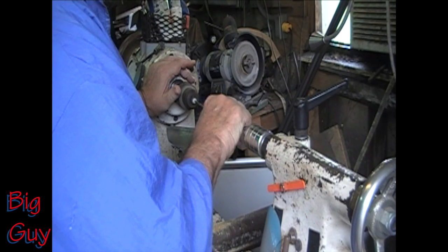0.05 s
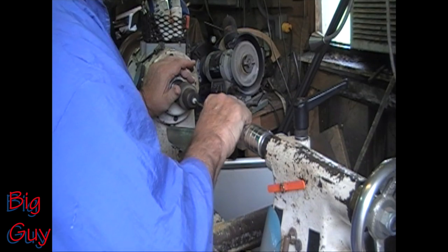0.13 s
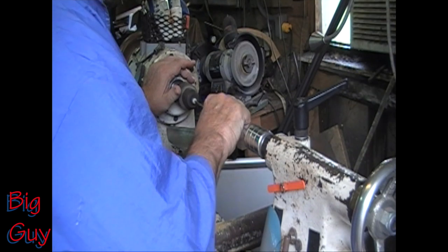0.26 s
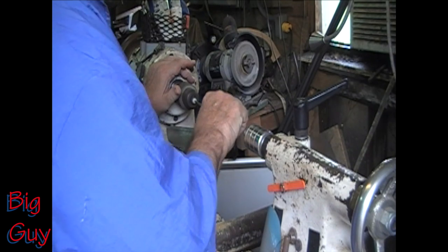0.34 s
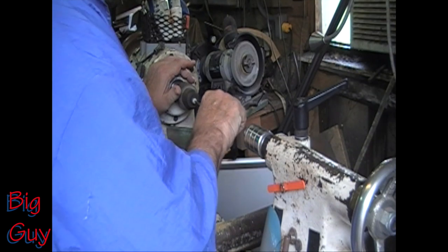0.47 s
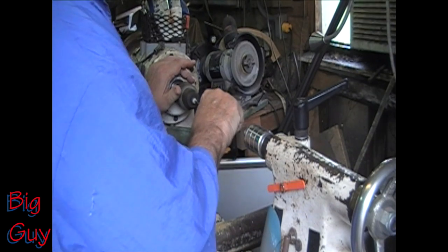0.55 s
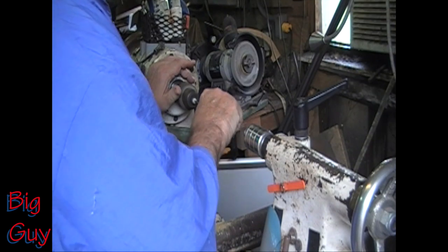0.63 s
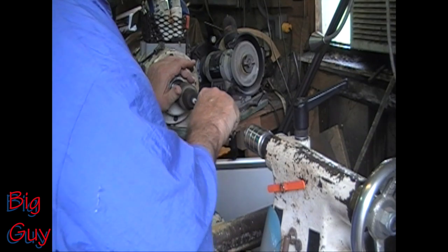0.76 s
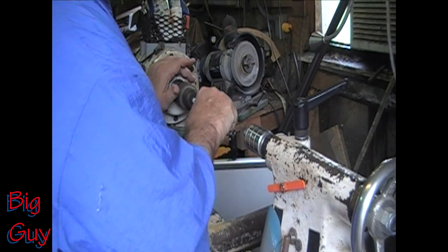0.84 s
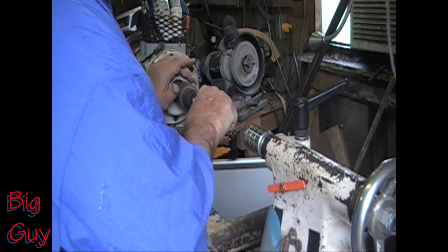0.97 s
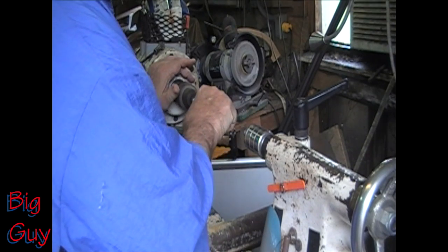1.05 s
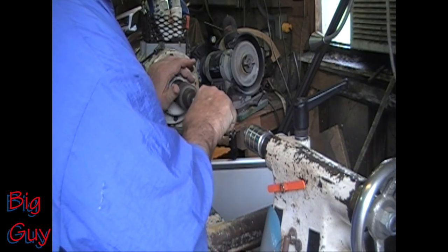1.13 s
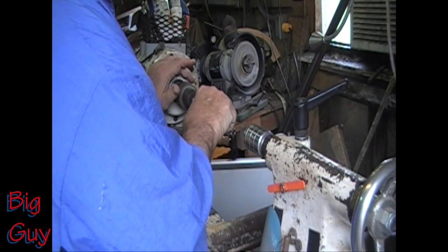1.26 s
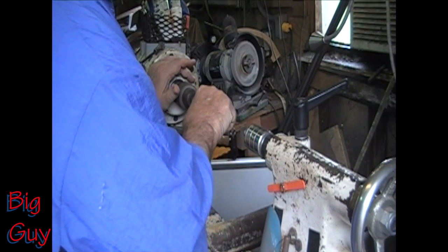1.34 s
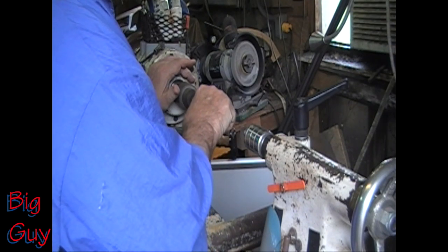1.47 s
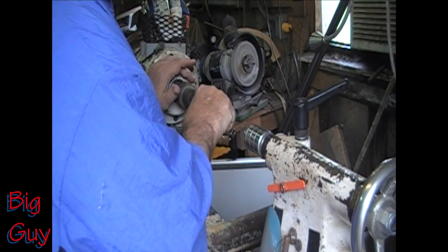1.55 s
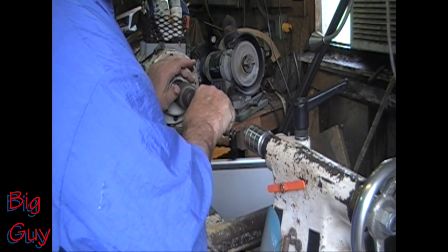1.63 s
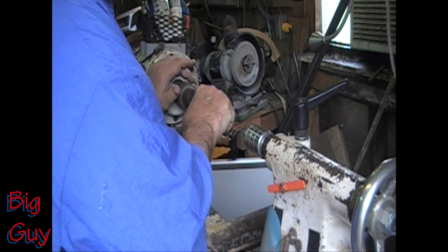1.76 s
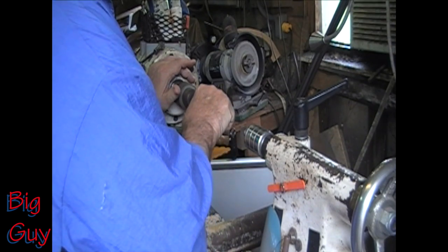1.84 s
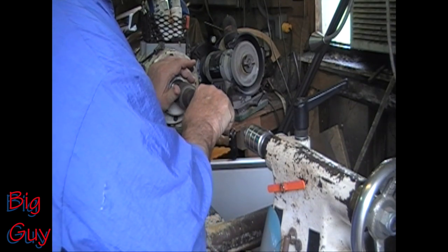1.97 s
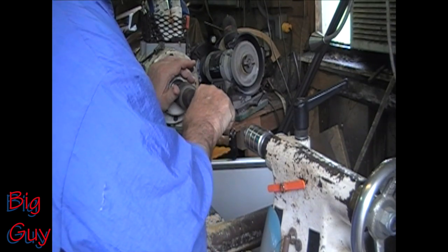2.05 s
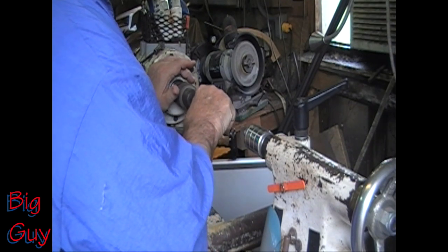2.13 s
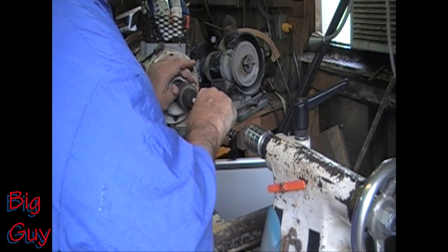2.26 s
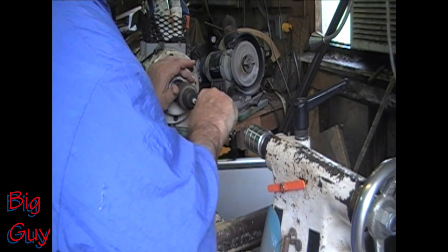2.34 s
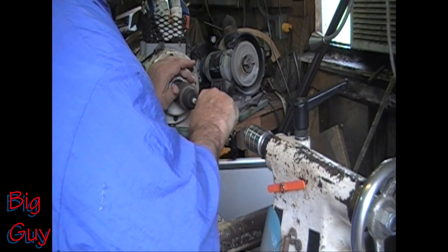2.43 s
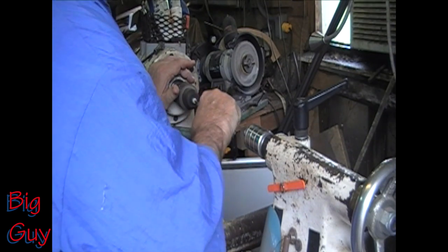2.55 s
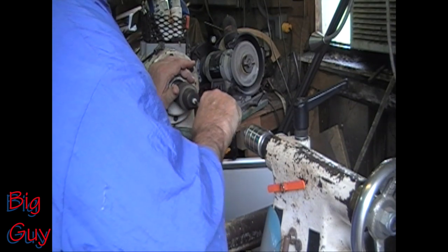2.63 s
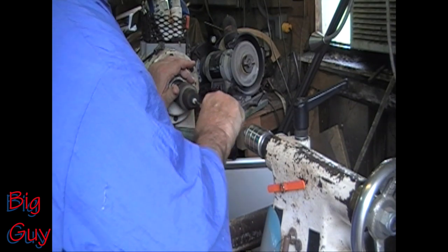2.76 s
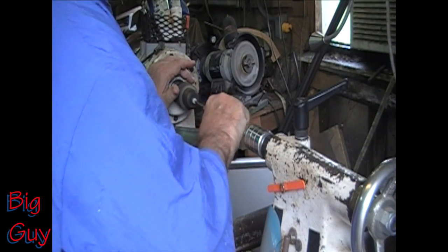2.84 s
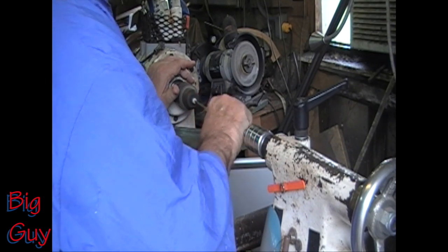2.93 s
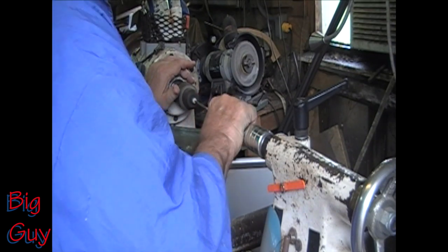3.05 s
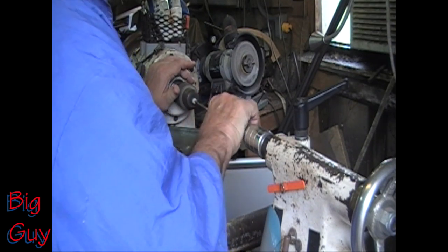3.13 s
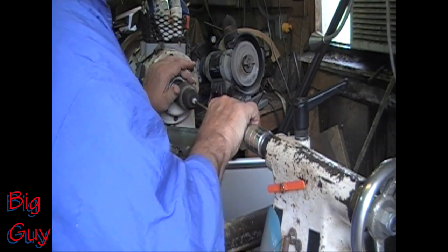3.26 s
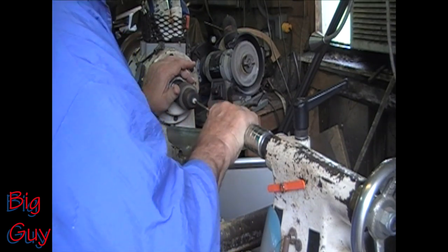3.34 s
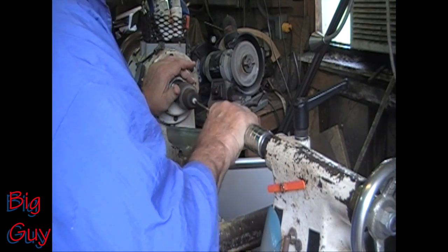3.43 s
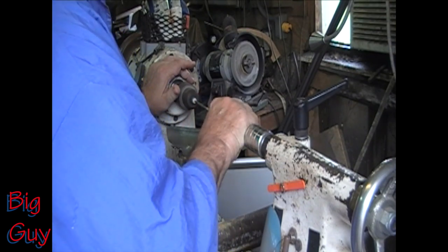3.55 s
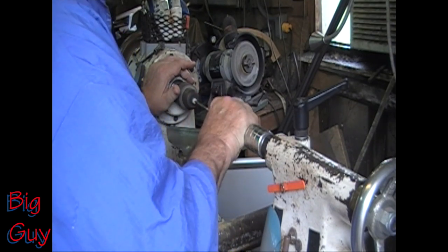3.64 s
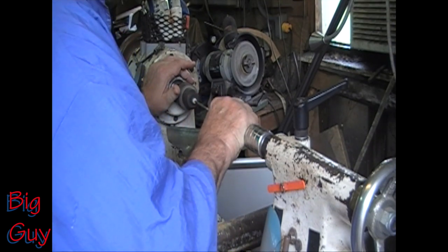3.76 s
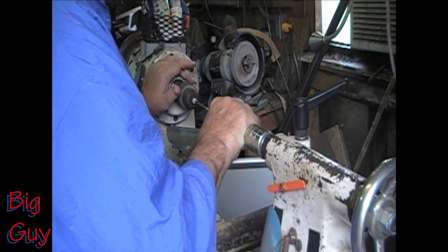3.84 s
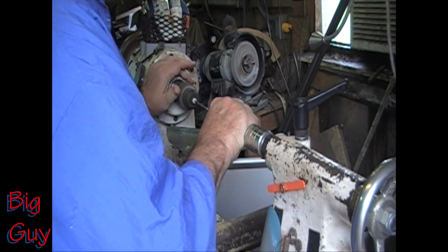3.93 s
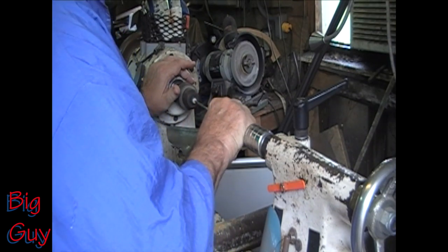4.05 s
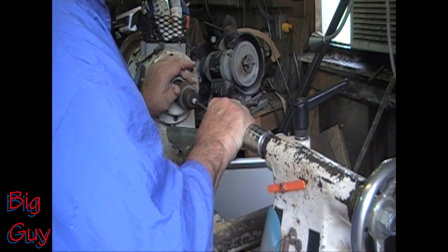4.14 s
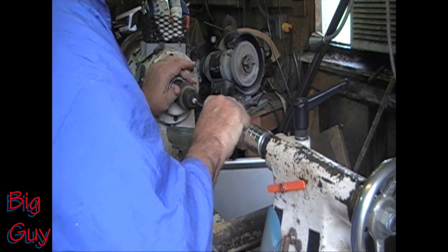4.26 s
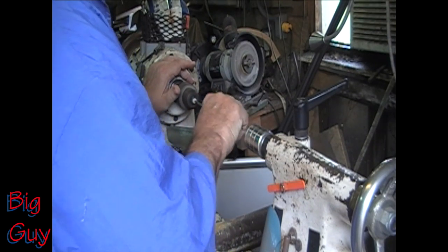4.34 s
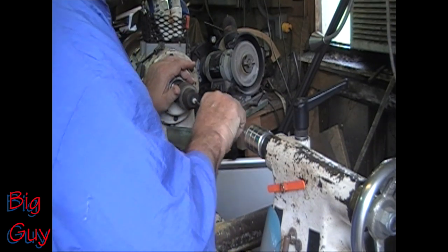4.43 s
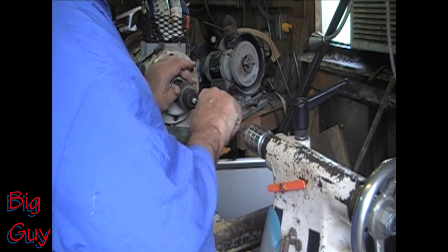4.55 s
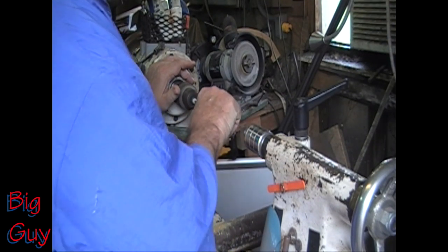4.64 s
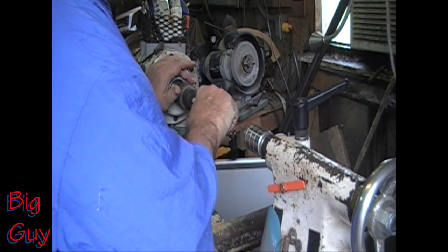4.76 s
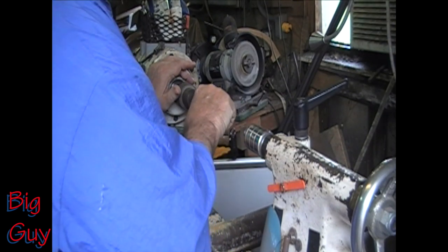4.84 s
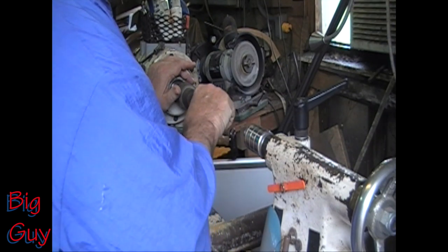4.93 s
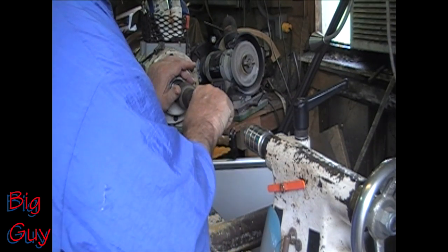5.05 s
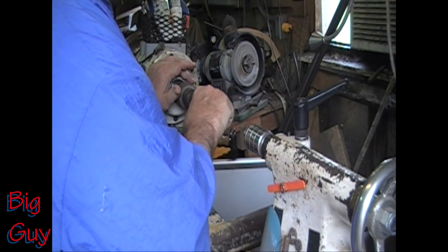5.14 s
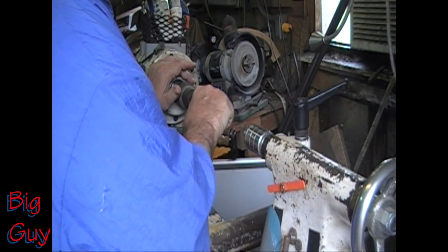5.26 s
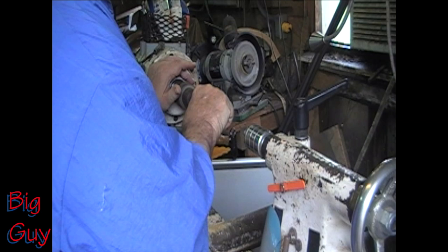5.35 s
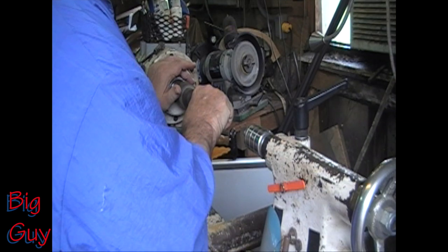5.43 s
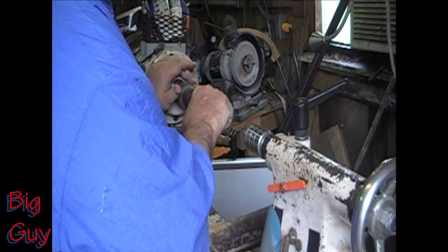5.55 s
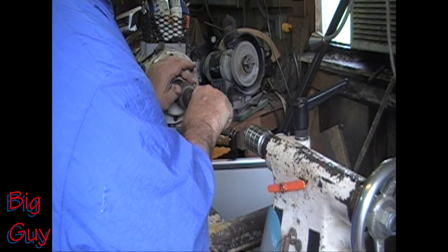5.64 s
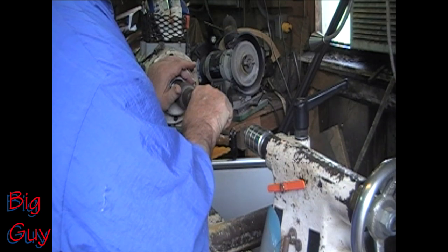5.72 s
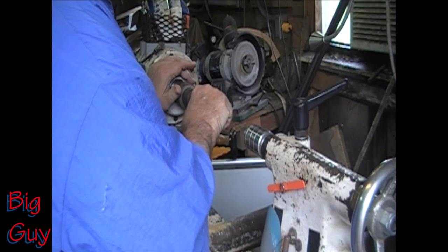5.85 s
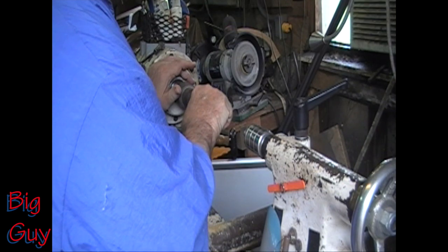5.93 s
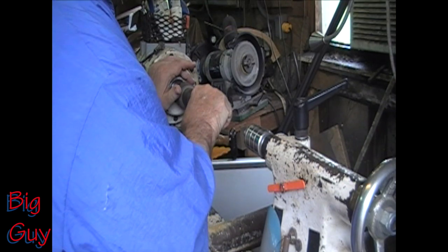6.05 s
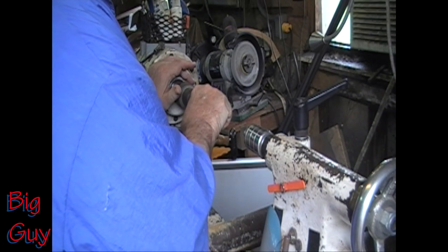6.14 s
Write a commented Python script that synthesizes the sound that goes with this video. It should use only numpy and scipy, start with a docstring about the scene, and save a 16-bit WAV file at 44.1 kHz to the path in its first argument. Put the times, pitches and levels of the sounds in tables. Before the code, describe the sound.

A wood lathe rumbles and rasps as a long drill bit bores in, breaking into two spells of piercing, wavering metallic squeals.

```python
"""A lathe rumbles, hums and rasps throughout as a long drill bit is pushed by hand into a spinning blank.
Faint chirps sound from the start and loud squeals from one second on, in a small workshop.
The steel squeals in the bore: friction excites near-sines that waver once per turn.
Rumble and rasp are noise shaped by resonances, the hum is a set of steady tones, a knock is a noise burst.
The recorder's gain control ducks under the loud squeals, so the rumble sinks and comes back slowly."""
import sys
import numpy as np
from scipy import signal
from scipy.fft import rfft, irfft, next_fast_len
from scipy.io import wavfile
from scipy.ndimage import uniform_filter1d, minimum_filter1d

SR = 44100
rng = np.random.default_rng(int(sys.argv[2]) if len(sys.argv) > 2 else 0)


def file_out(sig):
    """Save sig as 16-bit WAV at sys.argv[1]."""
    # one column per channel
    cols = np.atleast_2d(sig).T
    # limit, then scale
    lim = np.clip(cols, -1, 1)
    pcm = np.round(lim * 32767).astype(np.int16)
    wavfile.write(sys.argv[1], SR, pcm)


N = 272979

# Source levels are those ahead of the gain control.
# Squeals with a winding pitch and level, one table each:
# (time [s], pitch [Hz], level [dB], pitch swing per turn [%])
SQUEALS = [
    [(1.008, 7650, -50, 0.89), (1.02, 8050, -23, 0.67), (1.034, 8320, -2, 0.9), (1.05, 8970, -20.5, 0.5),
     (1.105, 9050, -27.5, 0.77), (1.14, 9280, -25.5, 3.1), (1.296, 9470, -21, 1.7),
     (1.36, 9460, -19.5, 2.86), (1.465, 9480, -24, 1.65), (1.495, 10090, -23.5, 3.2),
     (1.58, 9900, -23, 2.4), (1.63, 10100, -22, 2.75), (1.662, 10300, -28.5, 4.3), (1.695, 10090, -25, 3.4),
     (1.85, 9960, -24, 3.45), (1.94, 9870, -26, 2.9), (1.975, 10070, -24.5, 2.24), (2.02, 9630, -25, 2.7),
     (2.05, 9490, -22.5, 3.3), (2.078, 8960, -22, 2.4), (2.15, 8460, -20.5, 2.14),
     (2.21, 8270, -20.5, 1.27), (2.27, 8890, -23.5, 3.05), (2.37, 8530, -18.5, 2.4),
     (2.462, 8240, -17, 1.37), (2.475, 8270, -28, 1.35), (2.52, 8170, -21, 1.3), (2.566, 7540, -22.5, 1.25),
     (2.586, 7280, -16, 1.45), (2.662, 6820, -15.5, 2.35), (2.732, 6496, -21.5, 1.85),
     (2.745, 6130, -48.5, 1.7)],
    [(1.085, 10270, -39, 2.2), (1.18, 10570, -36, 3), (1.25, 10730, -26.5, 0.83), (1.31, 10800, -31, 1.08),
     (1.365, 10920, -28, 1.1), (1.435, 11130, -40, 1.1), (1.455, 11200, -52, 1.3)],
    [(4.705, 4580, -71, 1.1), (4.721, 4825, -49, 1.5), (4.742, 5140, -68.5, 1.5), (4.751, 5320, -43, 1.3),
     (4.762, 5300, -65, 1.3), (4.767, 5260, -36, 1.1), (4.795, 5320, -34, 2), (4.802, 5600, -30, 1.6),
     (4.811, 5620, -21.5, 1.4), (4.825, 6000, -53, 1.2), (4.85, 6200, -20.5, 0.74), (4.87, 6600, -63, 0.81),
     (4.877, 6640, -39, 0.92), (4.882, 6770, -15.5, 1.1), (4.954, 7980, -26.5, 2),
     (5.028, 8200, -19.5, 0.87), (5.075, 9100, -41, 1.3)],
    [(4.91, 3580, -56.5, 1.5), (4.926, 3800, -26.5, 0.46), (4.95, 3997, -27.5, 1.2),
     (4.975, 4060, -35.5, 0.57), (5.02, 3850, -78, 0.97)],
    [(5.095, 10160, -44.5, 2), (5.115, 9700, -33, 3.3), (5.165, 9410, -24.5, 1.24),
     (5.225, 9197, -22.5, 1.66), (5.3, 9490, -22.5, 0.84), (5.37, 9535, -18.5, 0.51),
     (5.44, 9560, -20, 0.39), (5.515, 9580, -21.5, 0.81), (5.58, 9220, -21, 1.2), (5.66, 9210, -18, 1.27),
     (5.72, 9176, -19, 1.1), (5.815, 9216, -20.5, 1.33), (5.974, 9230, -21.5, 1.77), (6.01, 9530, -29, 1.7),
     (6.05, 9340, -54, 1.7)],
    [(5.96, 12600, -54, 0.68), (5.998, 11750, -27.5, 1), (6.045, 11560, -23.5, 0.19),
     (6.11, 11470, -22.5, 0.39), (6.19, 11520, -23.5, 0.97)],
]
# Chirps and faint whistles that rise to one peak and fall: (peak time [s], rise [s], fall [s],
# first pitch [Hz], last pitch [Hz], peak level [dB], pitch swing per turn [%])
CHIRPS = [(0.019, 0.016, 0.026, 3520, 3220, -59, 5.1), (.07, .08, .3, 3300, 3240, -67, 3.2),
          (.1, 0.21, 0.29, 7620, 7700, -74.5, 1.8), (.38, .2, .08, 6100, 6300, -74, 1.5),
          (.48, .1, 0.21, 6800, 7370, -74.5, 2), (.83, .25, 0.22, 4540, 4530, -71.5, 1),
          (0.675, 0.018, 0.018, 4300, 4420, -62, 2.5), (0.681, 0.032, 0.036, 5990, 6210, -58.5, .5),
          (0.698, 0.026, 0.044, 6260, 6530, -58, .7), (0.7, .012, 0.027, 5150, 5400, -60.5, 3.1),
          (0.716, .014, 0.023, 6210, 6320, -46, 0.65), (0.724, 0.022, 0.042, 5770, 6010, -45.5, 2.2),
          (0.747, .018, 0.03, 5945, 6090, -58.5, 0.99), (0.737, 0.051, 0.081, 6600, 6750, -61.5, 4),
          (0.779, .04, 0.042, 6620, 6700, -61, 1.2), (0.86, 0.059, 0.086, 8700, 9550, -66, 3.2),
          (0.954, 0.0091, 0.023, 9080, 8940, -55.5, 3.3), (0.953, 0.031, 0.038, 10060, 11100, -67, 1.5),
          (1.005, 0.034, 0.01, 8900, 10000, -52, 1.3), (1.006, 0.049, 0.027, 10950, 9700, -50, 1.4),
          (1.494, 0.028, 0.13, 11400, 10750, -37, 2.5), (1.52, .04, .1, 8570, 8800, -52, 2),
          (1.66, 0.063, 0.074, 10600, 10900, -44, 2), (2.227, 0.02, 0.21, 9200, 8980, -30, 3.8),
          (2.457, 0.011, 0.045, 4404, 3960, -23.5, 3.9), (2.485, .012, 0.012, 4026, 4050, -24, 1.6),
          (2.73, 0.025, 0.041, 6930, 7230, -27.5, 2.3), (2.735, 0.068, 0.032, 5770, 5920, -47.5, 1.1),
          (2.743, 0.014, 0.071, 9650, 9200, -35.5, 1.1), (3.299, .04, 0.33, 4650, 4560, -72.5, 1.6),
          (3.966, 0.25, 0.095, 4520, 4580, -73, 1.5), (4.023, 0.013, .03, 3250, 3300, -57, 3.4),
          (4.037, 0.016, 0.037, 3300, 3324, -54, 3.8), (4.04, 0.027, .04, 7700, 7570, -75, 2.2),
          (4.18, .02, .04, 3200, 3280, -67, 2), (4.243, .02, .04, 7700, 7800, -80, 1.9),
          (4.268, 0.036, 0.065, 3243, 3480, -61.5, 1.5), (4.29, 0.053, 0.046, 7600, 7900, -78, 3.7),
          (4.708, 0.028, 0.03, 6190, 6170, -46, 2.1), (4.792, 0.02, 0.035, 6680, 6860, -49, 1.2),
          (4.828, 0.0082, 0.047, 6820, 7200, -29, 1.3), (5.079, 0.097, 0.073, 9100, 9940, -42, 1.8),
          (5.09, 0.035, 0.18, 8540, 9040, -30, 2.16), (5.924, 0.021, 0.072, 12100, 12450, -42, .7),
          (5.951, 0.0052, 0.029, 7860, 7800, -38, 7.6), (5.991, 0.013, 0.021, 6360, 6120, -39, 4),
          (6.003, 0.021, 0.025, 7200, 7280, -44, 3.3)]
CHIRP_RANGE_DB = 33  # climbed in the rise and lost in the fall
# The off-centre bore and two flutes bend the pitch each turn: (cycles per turn [1], share [1], phase [rad])
WOBBLE = [(1, 0.7, 5.76), (2, 0.47, 3.9), (3, 0.24, .63), (4, 0.24, 2.38), (5, 0.2, 2.8)]
# Overtones of each squeal, before their purity and treble losses: (multiple [1], level [dB re fundamental])
OVERTONES = [(2, -19), (3, -27.5)]
# Stereo place of the squeals, about which they wander: (time [s], left minus right [dB])
SQUEAL_LEAN = [(0.65, 5), (0.96, -3), (1.02, 9.5), (1.07, -0.5), (1.25, -1.5), (2.36, -0.5), (2.55, 7),
               (2.89, 1.5), (3.72, 4), (4.68, 3.5), (5.0, 4.5), (5.11, -2), (5.16, 4.5), (5.35, -0.5),
               (5.88, 0.5), (5.99, -1.5), (6.05, 7), (6.19, -2.5)]
# Moments when the squeal drops out: (time [s], half length [s], loss [dB])
SLIPS = [(1.482, 0.0041, 9), (2.04, 0.0039, 8.5), (2.572, 0.004, 6), (2.632, 0.0076, 11),
         (2.692, 0.0032, 10), (4.759, .005, 12.5), (4.822, 0.0047, 10), (4.873, 0.0039, 12),
         (4.963, 0.0049, 10), (5.08, .006, 5), (5.2, 0.0042, 5.5), (5.334, 0.0045, 7.5),
         (5.431, 0.0039, 10), (5.466, 0.0033, 10), (5.495, 0.0049, 13), (5.606, .006, 9),
         (5.67, 0.0056, 10)]
TURNS_PER_S = 32.1
BALANCE_WANDER_DB, GRIP_CHANCE_DB = 2, 2.6
# The rougher the bore, the more the grip flutters: share per % of swing
FLUTTER_HZ, FLUTTER_PER_SWING = 380, 0.13
# Quieter squeals are purer: overtone dB lost per dB under the full level
OVERTONE_GROWTH, OVERTONE_FULL_DB, OVERTONE_CHANCE_DB = 0.3, -39.5, 4
OVERTONE_KNEE_HZ, OVERTONE_LOSS_DB_PER_KHZ = 12500, 3.5
SATURATION = 3.77  # per squared height: two squeals at once breed side tones

# Broad colour of the rasp: (frequency [Hz], density [dB per Hz, relative])
RASP = [(760, -31.5), (1300, -18), (1660, 5), (1880, -6), (2060, 3), (2290, -16.5), (3000, -25),
        (3900, -45.5), (6600, -120)]
# Resonances of bit and blank: (frequency [Hz], width [Hz], height before the common lift [dB])
BIT = [(1642, 16, 11), (2026, 12, 6), (2830, 32, -8.5), (2930, 20, -22), (3365, 60, -7)]
# Depth of the cut: (time [s], rasp level [dB])
CUT = [(0.0, -63.5), (1.0, -65), (1.2, -68), (1.48, -62), (1.57, -58), (2.02, -62.5), (2.08, -71.5),
       (2.8, -64.5), (3.28, -70.5), (3.5, -66), (3.95, -67), (4.07, -64.5), (4.74, -67), (4.9, -66.5),
       (5.14, -64), (6.19, -67)]
# Bites of the bit, with brief chatter: (time [s], half length [s], change of the whole rasp and chatter [dB],
# chatter pitch [Hz], chatter peak before its stereo lean [dB re rasp rms])
BITES = [(0.22, 0.019, -4, 1663, 9.5), (0.437, 0.011, 6.5, 1644, 1), (0.47, 0.013, 0.5, 2256, 3),
         (1.615, 0.0074, 2, 1730, 5), (1.713, 0.021, 0, 1660, 13), (1.75, .008, 3.5, 1660, 3),
         (1.794, .006, 3.5, 1760, 10.5), (1.92, 0.0059, 8, 1630, -3), (2.009, 0.011, -3.5, 1650, 13),
         (3.328, 0.021, 6, 1656, 7), (3.558, 0.013, 6.5, 1637, 3.5), (3.56, 0.017, 0.5, 2033, 0.5),
         (3.773, .016, -1.5, 1655, -6.5), (3.84, 0.012, 3.5, 1644, -5), (4.259, .016, 0, 1670, 0.5)]
# Chips knock on the bit: (time [s], burst level before filtering [dB], centre frequency [Hz])
KNOCKS = [(2.8616, -39.5, 3730)]
KNOCK_ATTACK_S, KNOCK_T60_S = 0.0028, 0.051

# The lathe's rumble and hum over time: (time [s], level [dB], extra lean to the left [dB])
LATHE = [(0.0, -57, -0.5), (.3, -57.5, 0), (.55, -57.5, -0.5), (.8, -59.5, 1), (1.0, -60.5, 1.5),
         (1.1, -58, -2), (1.4, -55, -3), (1.6, -51.5, 1), (1.8, -54.5, -2), (2.03, -55.5, -1),
         (2.1, -59, -1.5), (2.45, -60.5, -2), (2.8, -60.5, -3.5), (2.9, -56.5, -2.5), (3.2, -60.5, 0),
         (3.399, -65.5, 0), (3.5, -63.5, 3.5), (3.7, -65, 3.5), (3.93, -63, 4.5), (4.0, -65, 2.5),
         (4.06, -59.5, 2), (4.17, -66, 3.5), (4.21, -59, 2), (4.3, -63, 2), (4.72, -57, -0.5),
         (4.9, -58.5, -3.5), (5.202, -55, -2), (5.599, -55, -3), (6.19, -56.5, -2.5)]
# Broad colour of the rumble: (frequency [Hz], density [dB per Hz, relative])
RUMBLE = [(24, -77.5), (40, -56), (100, -28), (265, -9.5), (344, -14.5), (470, -4.5), (542, -19), (656, -4),
          (1220, -16.5), (1670, -12.5), (2330, -21), (2820, -21), (3180, -24), (4660, -26), (7710, -31),
          (12100, -58.5), (15800, -92), (22000, -120)]
# Bed and headstock resonances: (frequency [Hz], width [Hz], height before the common lift [dB])
FRAME = [(264, 36, -11), (428, 140, -4), (694, 280, -6.5), (2547, 230, -8.5), (2940, 77.1, -17),
         (3300, 310, -16), (4560, 150, -12), (5600, 150, -16.5), (6360, 1300, -20), (7300, 310, -24),
         (8430, 660, -27.5)]
# Hum tones: (ratio to motor frequency [1], mean peak before stereo lean [dB re rumble rms])
HUM = [(6, -13), (7.23, -11.5), (9, -14.5), (10, -12), (11, -3), (12, -10), (13.75, -16), (15, -19.5),
       (16, -25.5), (19.25, -16), (21, -12), (22, -21.5), (23, -19.5), (24, -18), (33, -16.5), (68, -16.5)]
# The frame lurches and the low rumble jumps up: (time [s], half length [s], lift [dB])
LURCHES = [(.295, 0.0076, 1.5), (.511, 0.031, 2.5), (.684, 0.0082, 3.5), (.868, 0.0066, 7),
           (1.586, 0.018, 3.5), (1.699, .012, 6), (2.004, 0.01, 4.5), (3.081, 0.014, 2.5),
           (3.473, 0.0085, 3.5), (3.762, 0.0056, 7), (3.907, .008, 5), (4.553, 0.01, 2.5),
           (5.227, 0.014, 2)]
# Stereo lean of rumble, hum and rasp: (frequency [Hz], left minus right [dB])
LATHE_BALANCE = [(60, 1.5), (140, 7), (350, 9), (840, 8), (2020, 3.5), (4860, 1), (11700, 6.5)]
# Left-right correlation of rumble and rasp: (frequency [Hz], likeness [1])
LATHE_LIKENESS = [(60, .8), (270, 0.91), (570, .94), (1220, 0.96), (2590, .96), (5500, 0.94), (11700, .3)]
MOTOR_HZ, HUM_WAVER, HUM_WAVER_DB = 42.85, .0007, 1.3  # HUM_WAVER is a share of the frequency
GRAIN_DB, LURCH_TOP_HZ = 0.5, 1100

SHOP_T60_S, SHOP_DB = 0.14, -2  # reverberation, level relative to the direct sound
FLOOR_DB, FLOOR_LOW_HZ, FLOOR_TOP_HZ = -70, 70.4, 264  # a low murmur that does not duck
FULL_GAIN_DB, CEILING_DB, RECOVERY_DB_PER_S = 27, -14, 16
SENSE_S, ATTACK_S = 0.0065, 0.0025
MIC_TOP_HZ, CUTOFF_HZ = 13500, 15800
LIMIT = 0.49  # amplitude


def squeals():
    """Superposition and saturation: all squeals shake one bit, which compresses and radiates no bass."""
    out = np.zeros((2, N), complex)
    for rows in SQUEALS + [chirp(*row) for row in CHIRPS]:
        add_squeal(out, rows)
    out = np.real(out / np.sqrt(1 + SATURATION * abs(out) ** 2))
    return signal.sosfilt(signal.butter(4, 2600, "high", fs=SR, output="sos"), out)


def add_squeal(out, rows):
    """Friction-driven oscillation: a rotating phasor whose pitch and grip are modulated each turn."""
    s, *columns = np.transpose(rows)
    at = np.arange(round(s[0] * SR), min(round(s[-1] * SR), N))
    size = len(at)
    hz, db, swing = [np.interp(at / SR, s, column) for column in columns]
    turn = 2 * np.pi * TURNS_PER_S * at / SR

    bend = sum(share * np.sin(times * turn + start) for times, share, start in WOBBLE)
    bend += 0.13 * drift(40.0, size=size)
    phase = 2 * np.pi * np.cumsum(hz * (1 + swing / 100 * bend)) / SR

    tone = np.exp(1j * phase)
    purer_db = OVERTONE_GROWTH * np.minimum(db - OVERTONE_FULL_DB, 0)
    purer_db += OVERTONE_CHANCE_DB * drift(30.0, size=size)
    for multiple, overtone_db in OVERTONES:
        above_khz = np.maximum(multiple * hz - OVERTONE_KNEE_HZ, 0) / 1000
        gain = from_db(overtone_db - OVERTONE_LOSS_DB_PER_KHZ * above_khz + purer_db)
        below_nyquist = np.clip((SR / 2 - multiple * hz) / 3000, 0, 1)  # avoids aliasing
        tone += gain * np.exp(1j * multiple * phase) * below_nyquist

    grip_db = db + (1.5 + 0.86 * swing) * np.sin(turn + 3.6) + 2.0 * np.sin(2 * turn + 1.8)
    grip = from_db(grip_db + GRIP_CHANCE_DB * drift(110.0, size=size))
    grip *= 1 + FLUTTER_PER_SWING * swing * drift(FLUTTER_HZ, size=size, order=10)

    # fade both ends, except an end that meets the end of the scene
    to_end = at[-1] - at + N * (at[-1] == N - 1)
    edge = np.clip(np.minimum(at - at[0], to_end) / (0.014 * SR), 0, 1)
    fade = np.sin(edge * np.pi / 2) ** 2
    pan_db = np.interp(at / SR, *np.transpose(SQUEAL_LEAN))
    pan_db = pan_db + BALANCE_WANDER_DB * drift(10.0, size=size)
    out[:, at] += np.sqrt(2) * tone * grip * fade * from_db([pan_db / 2, -pan_db / 2])


def chirp(peak_s, rise_s, fall_s, first_hz, last_hz, db, swing):
    """Frequency glide: pitch moves evenly while the level climbs to a peak and falls away."""
    low_db = db - CHIRP_RANGE_DB
    peak_hz = first_hz + (last_hz - first_hz) * rise_s / (rise_s + fall_s)
    return [(max(peak_s - rise_s, 0), first_hz, low_db, swing), (peak_s, peak_hz, db, swing),
            (peak_s + fall_s, last_hz, low_db, swing)]


def rasp():
    """Resonant filtering: cutting noise excites bit and blank, and brief bites add chatter tones."""
    t = np.arange(N) / SR
    out = resonant_noise(RASP, BIT, lift_db=2.0, patchy_db=2.5)
    level_db = np.interp(t, *np.transpose(CUT))
    for s, half_s, change_db, hz, chatter_db in BITES:
        bite = np.exp(-((t - s) / half_s) ** 2)
        level_db = level_db + change_db * bite
        chatter_gain = from_db(chatter_db + np.array([[2.0], [-2.0]]))  # leans left
        out = out + chatter_gain * bite * np.sin(2 * np.pi * hz * t)
    return out * from_db(level_db)


def knocks():
    """Impulsive excitation: a short bright noise burst with a ring at its centre frequency."""
    out = np.zeros(N)
    for s, db, hz in KNOCKS:
        t = np.arange(int(.05 * SR)) / SR
        envelope = from_db(db - 60 * t / KNOCK_T60_S) * np.minimum(t / KNOCK_ATTACK_S, 1)
        burst = rng.standard_normal(len(t)) * envelope
        wide = signal.sosfilt(signal.butter(2, [2800, 11000], "band", fs=SR, output="sos"), burst)
        ring_band = signal.butter(1, [hz * 0.86, hz * 1.16], "band", fs=SR, output="sos")
        ring = signal.sosfilt(ring_band, burst)
        out[round(s * SR):][:len(t)] += 0.28 * wide + 2.2 * ring
    return out


def lathe():
    """Forced vibration: rumble and hum share one level, and lurches lift their low part."""
    t = np.arange(N) / SR
    out = resonant_noise(RUMBLE, FRAME, lift_db=-9.5, patchy_db=1.5) * from_db(GRAIN_DB * drift(70.0))
    out += hum()
    low = signal.sosfiltfilt(signal.butter(2, LURCH_TOP_HZ, fs=SR, output="sos"), out)
    out += low * (from_db(bumps(LURCHES)) - 1)
    s, *columns = np.transpose(LATHE)
    level_db, lean_db = [np.interp(t, s, column) for column in columns]
    return out * from_db(level_db + lean_db * [[.5], [-.5]])


def hum():
    """Line spectrum: steady tones, most at whole multiples of the motor frequency, a few between."""
    out = np.zeros((2, N))
    turns = np.cumsum(MOTOR_HZ * (1 + HUM_WAVER * drift(3.3))) / SR
    for (ratio, db), start in zip(HUM, rng.random(len(HUM))):
        tone = np.sin(2 * np.pi * (ratio * turns + start)) * from_db(db + HUM_WAVER_DB * drift(7.0))
        lean = from_db(at_hz(LATHE_BALANCE, ratio * MOTOR_HZ) / 2)
        out += np.outer([lean, 1 / lean], tone)
    return out


def shop(x):
    """Reverberation: direct sound plus a dense decaying tail, unlike between channels mostly in the treble."""
    t = np.arange(int(.6 * SR)) / SR
    mid, side = rng.standard_normal((2, len(t))) * from_db(-60 * t / SHOP_T60_S) * (t > .003)
    side = signal.sosfilt(signal.butter(2, [7500, 12000], "band", fs=SR, output="sos"), side)
    tail = mid + 1.19 * side * [[1], [-1]]
    tail *= from_db(SHOP_DB) / np.sqrt(np.sum(tail ** 2, axis=1, keepdims=True))
    tail[:, 0] = 1  # direct sound
    return signal.fftconvolve(x, tail, axes=1)[:, :N] / np.sqrt(1 + from_db(2 * SHOP_DB))


def floor():
    """Partially correlated noise: a dull steady murmur, mostly alike in both channels."""
    mid, left, right = rng.standard_normal((3, N))
    band = signal.butter(2, [FLOOR_LOW_HZ, FLOOR_TOP_HZ], "band", fs=SR, output="sos")
    return from_db(FLOOR_DB) * rms_one(signal.sosfilt(band, mid + 0.49 * np.array([left, right])))


def gain_control(x):
    """Feed-forward compression: gain drops fast above a ceiling and creeps back at a steady rate."""
    t = np.arange(N) / SR
    sense, attack = np.exp(-1 / (SENSE_S * SR)), np.exp(-1 / (ATTACK_S * SR))
    power = signal.lfilter([1 - sense], [1, -sense], np.mean(x ** 2, axis=0))
    level_db = 10 * np.log10(power + 1e-12)
    over_db = np.maximum(level_db + FULL_GAIN_DB - CEILING_DB, 0)
    # a running maximum on a tilted axis gives the steady recovery
    held_db = np.maximum.accumulate(over_db + RECOVERY_DB_PER_S * t) - RECOVERY_DB_PER_S * t
    return x * from_db(FULL_GAIN_DB - signal.lfilter([1 - attack], [1, -attack], held_db))


def resonant_noise(spectrum, modes, lift_db, patchy_db):
    """Modal filtering: stereo noise with resonant peaks; bands swell alone, the treble also fast; mid rms 1."""
    size = next_fast_len(N)
    hz = np.maximum(np.arange(size // 2 + 1) * SR / size, 1)
    power = from_db(2 * at_hz(spectrum, hz))
    for mode_hz, width, db in modes:
        power = power + from_db(2 * (db + lift_db)) / (1 + (2 * (hz - mode_hz) / width) ** 2) ** 2

    mid, side = rfft(rng.standard_normal((2, size))) * np.sqrt(power)
    alike = np.clip(at_hz(LATHE_LIKENESS, hz), 0, 1)
    lean = from_db(at_hz(LATHE_BALANCE, hz) / 2)
    pair = np.sqrt(1 + alike) * mid + np.sqrt(1 - alike) * side * [[1], [-1]]
    pair = pair * [lean, 1 / lean]

    out = 0
    for octave in np.arange(7, 13.5, .5):  # log2 of the band centre in Hz
        share = np.clip(1 - 2 * abs(np.clip(np.log2(hz), 7, 13) - octave), 0, 1)
        swell = drift(12.1) + (octave - 4.5) * 0.15 * drift(25.0)
        out = out + irfft(pair * share, size)[:, :N] * from_db(patchy_db * swell)
    return out / np.sqrt(np.mean(out.mean(axis=0) ** 2))


def drift(rate, size=N, order=4):
    """Band-limited chance: noise through a low-pass at `rate` Hz, run in for half a second; rms 1."""
    low_pass = signal.butter(order, rate, fs=SR, output="sos")
    slow = signal.sosfilt(low_pass, rng.standard_normal(size + SR // 2))
    return rms_one(slow[SR // 2:])


def bumps(rows):
    """Additive level change: the sum of bell-shaped swells, in dB."""
    t = np.arange(N) / SR
    return sum(db * np.exp(-((t - s) / half_s) ** 2) for s, half_s, db in rows)


def at_hz(points, hz):
    """Logarithmic frequency scale: read a spectrum between its points."""
    points_hz, values = np.transpose(points)
    return np.interp(np.log(hz), np.log(np.maximum(points_hz, 1)), values)


def rms_one(x):
    """Power normalisation: scale to unit rms."""
    return x / np.sqrt(np.mean(x ** 2) + 1e-20)


def from_db(db):
    """Level definition: decibels to amplitude ratio."""
    return 10 ** (np.asarray(db) / 20)


def scene():
    """Superposition: squeals and knocks ring in the shop, with brief slips, over rasp and lathe."""
    return shop(squeals() + knocks()) * from_db(-bumps(SLIPS)) + rasp() + lathe()


def record(dry):
    """Transduction: microphone low-pass, gain control, steady floor, peak limiter and a steep top cut."""
    heard = signal.sosfilt(signal.butter(2, MIC_TOP_HZ, fs=SR, output="sos"), dry)
    levelled = gain_control(heard) + floor()
    allowed = np.minimum(1, LIMIT / (abs(levelled).max(axis=0) + 1e-9))
    gain = uniform_filter1d(minimum_filter1d(allowed, size=300), size=300)
    return signal.sosfilt(signal.cheby2(22, 60, CUTOFF_HZ, fs=SR, output="sos"), levelled * gain)


dry = scene()
out = record(dry)
file_out(out)
```